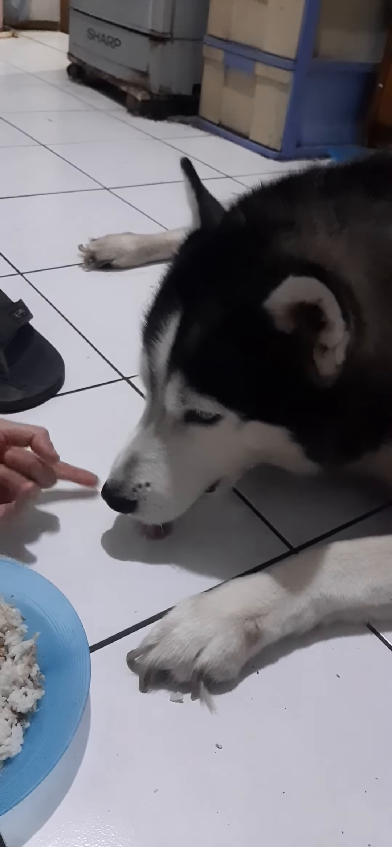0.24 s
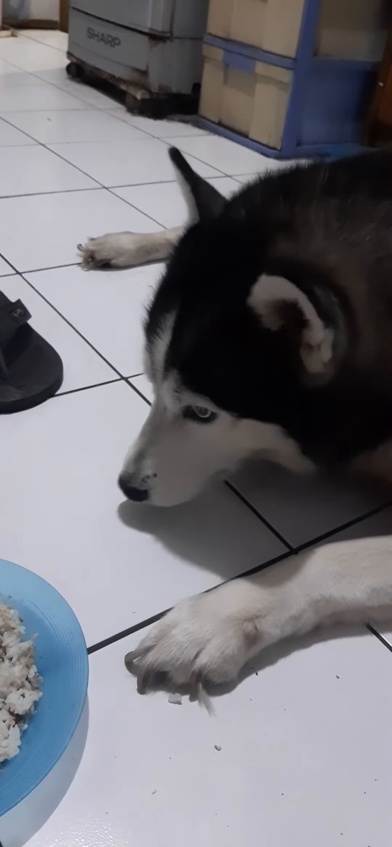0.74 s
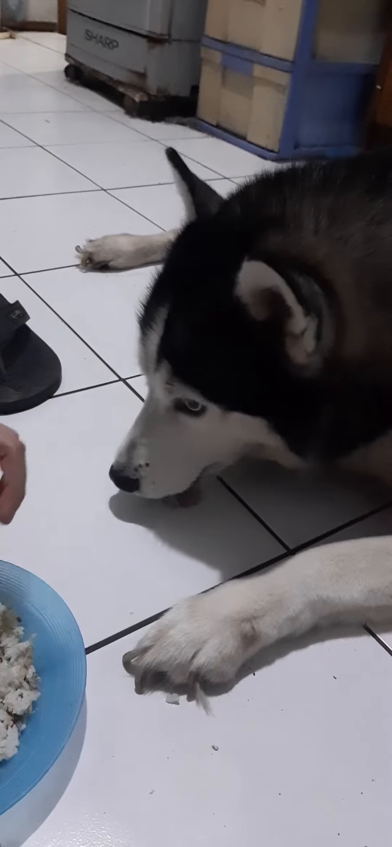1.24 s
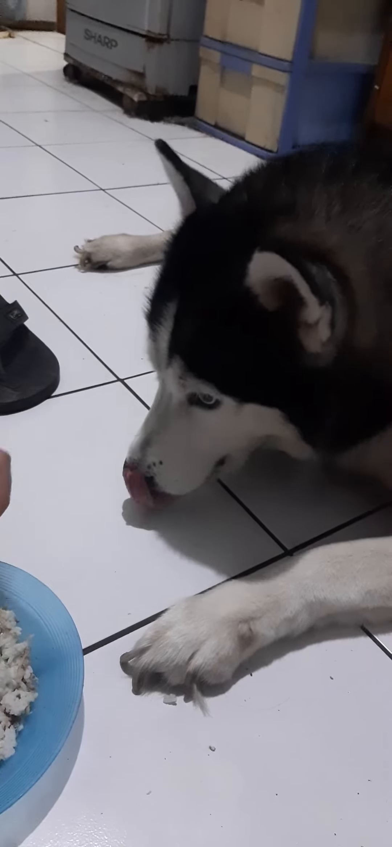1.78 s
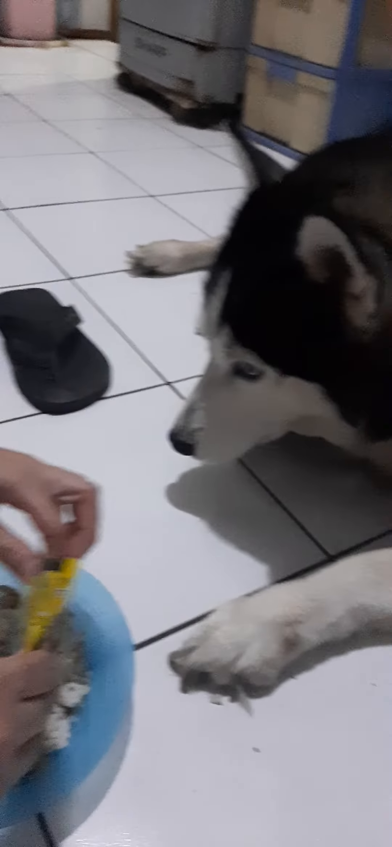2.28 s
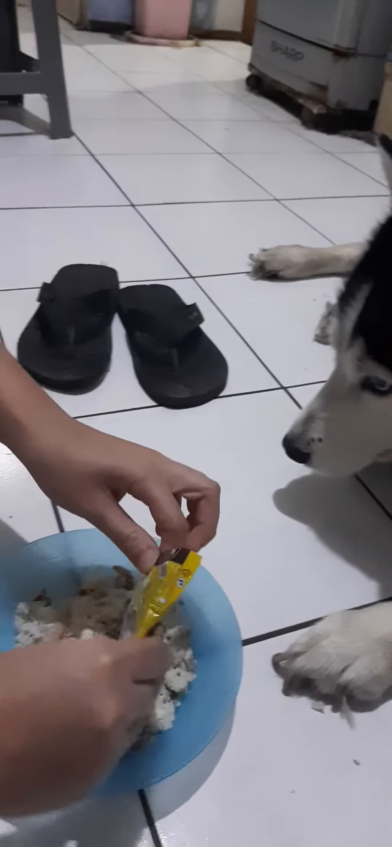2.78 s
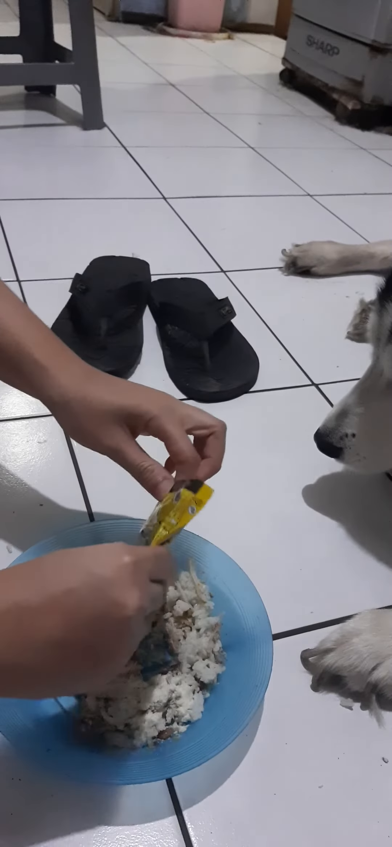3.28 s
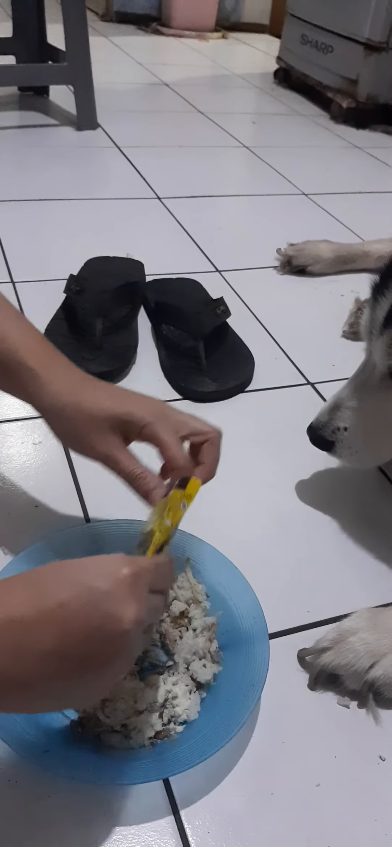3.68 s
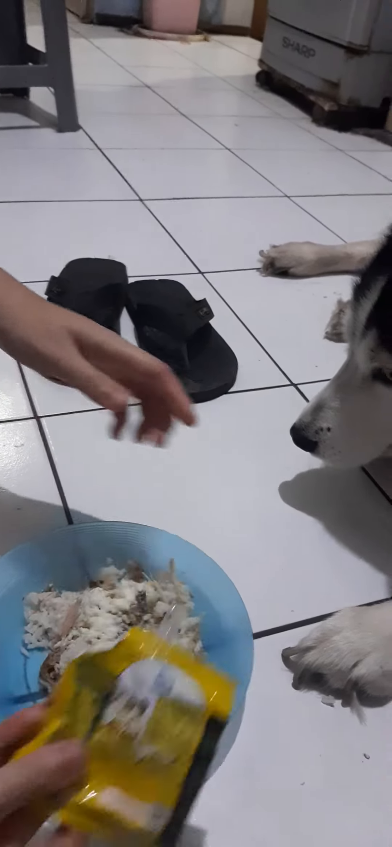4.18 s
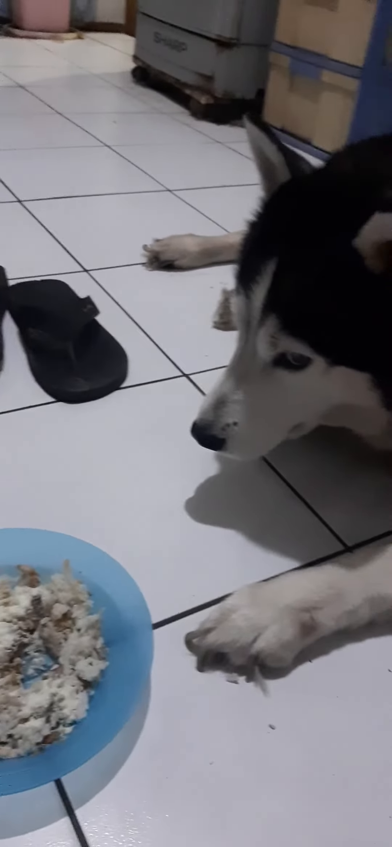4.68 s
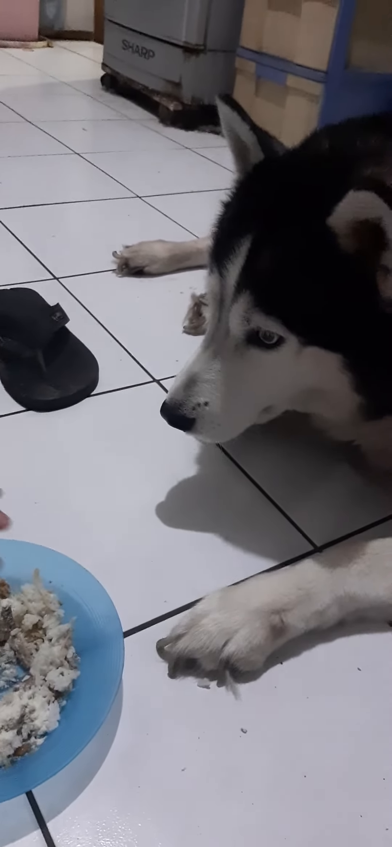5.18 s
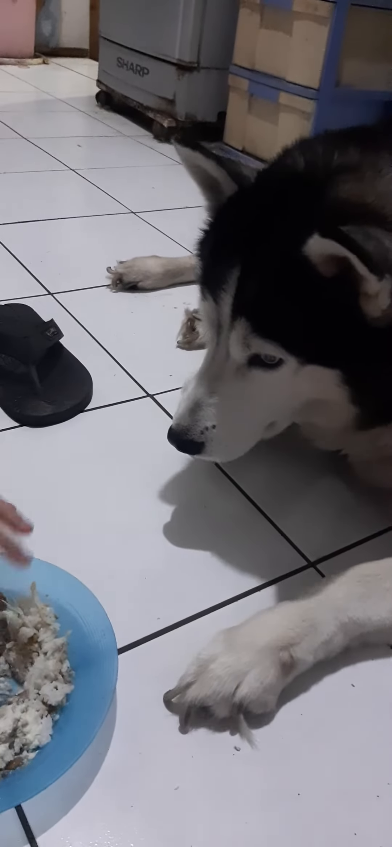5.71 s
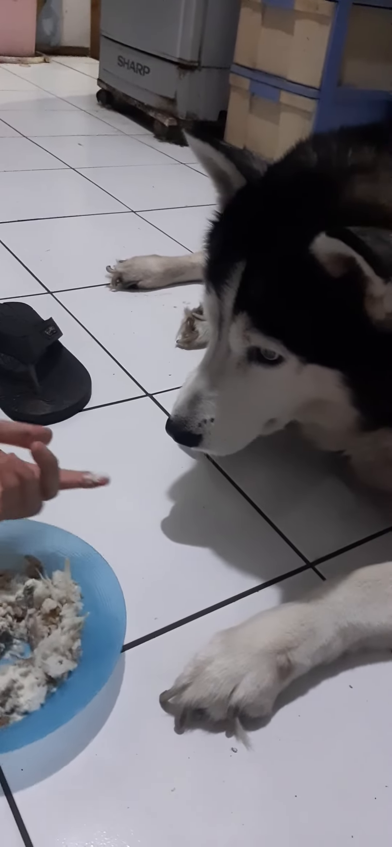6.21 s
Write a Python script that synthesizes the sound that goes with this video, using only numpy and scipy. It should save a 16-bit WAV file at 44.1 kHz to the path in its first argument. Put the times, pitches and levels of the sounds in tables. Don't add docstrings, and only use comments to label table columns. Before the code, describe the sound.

A small plastic sachet crackles sharply in the hands, torn, squeezed and crumpled close by in a tiled room over a low machine hum.

```python
import sys
import numpy as np
from scipy import signal
from scipy.fft import rfft, irfft, next_fast_len
from scipy.io import wavfile
from scipy.ndimage import uniform_filter1d, map_coordinates

SR = 44100
rng = np.random.default_rng(int(sys.argv[2]) if len(sys.argv) > 2 else 0)


def digitize_waveform(pressure):
    field = np.atleast_2d(pressure).T
    bounded = np.clip(field, -1, 1)
    quanta = np.round(bounded * 32767).astype(np.int16)
    wavfile.write(sys.argv[1], SR, quanta)


def voltage_ratio(decibels):
    exponent = np.asarray(decibels, float) / 20
    return 10 ** exponent


N = 284445
TIME = np.arange(N) / SR
FLURRY = 1024

# time in seconds
# (the flurry begins 1.8 ms earlier), # level in dB, ring in Hz, treble in dB, length in ms.
DEEP_FOLDS = [(.5663, -51.5, 2340, -11, 7), (0.5906, -55, 2750, 4.5, 7.5), (0.7168, -51.5, 2440, 0, 4.6),
              (.7487, -40, 5570, -4.5, 2.5), (0.9005, -40.5, 2550, 5.5, 3),
              (1.0922, -42, 1720, -20, 2.7), (1.0985, -36, 2250, -3, 6.1), (1.159, -44, 2120, -13, 4),
              (1.1841, -44, 1550, -18, 5.9), (1.4627, -37, 3800, -6.5, 4.7), (1.4832, -44, 1980, -4, 4),
              (1.543, -42, 2280, -16, 4.2), (1.5762, -39, 2020, -30, 6.5), (1.6433, -41, 1500, -28, 7.1),
              (1.654, -39.5, 5200, -9, 5.2), (1.708, -37.5, 2060, -7, 4.3), (1.753, -35, 1900, -3.5, 12),
              (1.8326, -39.5, 2070, -5, 9.7), (1.9347, -44.5, 2150, -2, 4.1),
              (1.9765, -51, 2130, -5, 5.9), (2.008, -42, 2160, -2.5, 3.5), (2.0798, -50, 2070, -12, 3.7),
              (2.098, -39, 3800, -3, 8.1), (2.1417, -46.5, 4390, -2, 6.3), (2.165, -49, 2080, 2, 6.8),
              (2.1997, -47, 1970, 0, 5.5), (2.2504, -48, 2130, -4, 7.7), (2.2788, -43, 2770, -13, 7.7),
              (2.3245, -45.5, 4400, 6, 3.7), (2.35, -49, 2070, -15, 5.1),
                   (2.463, -36.5, 3970, -8, 5.6), (2.5081, -42, 2500, -1, 6), (2.542, -39, 4300, -22, 5.1),
                   (2.5921, -40.5, 3950, 0, 5), (2.6141, -39.5, 2030, -6, 6), (2.621, -41, 1080, -10, 3.7),
                   (2.7835, -40.5, 1010, -22, 5.4), (2.8243, -44, 4520, 5, 4.5),
                   (2.9889, -41, 2020, -20, 4.6), (3.0318, -47.5, 2190, -16, 4.1),
                   (3.0662, -44, 5070, 2, 5.5), (3.0753, -48.5, 2240, 3, 5.5),
                   (3.1113, -45.5, 2170, -6, 6.6), (3.1328, -43, 1620, 0.5, 5.5),
                   (3.155, -42, 2360, -23, 4.8), (3.2103, -45, 2300, 10.5, 4.6),
                   (3.3424, -44, 2200, -8, 8.9), (3.366, -45, 2370, -12, 6.1), (3.4331, -42, 4160, -10, 6),
                   (3.5403, -43.5, 2270, -10, 5.3), (3.6035, -30.5, 2190, -4, 7.6),
                   (3.6219, -26, 2100, -1.5, 2.9), (3.6775, -33, 2150, -6, 6.8),
                   (3.715, -26.5, 2180, 1, 4.4), (3.7951, -41.5, 1940, -36, 5.1),
                   (3.815, -35.5, 2090, -9, 11), (3.9048, -49, 2000, -12, 5.5),
                   (4.1264, -47.5, 1090, -29, 8.8), (4.661, -37, 4300, -5, 3.5)]
# time in seconds (the flurry begins 1.8 ms earlier), level in dB, ring in Hz, treble in
# dB, length in ms.
THIN_CREASES = [(.5542, -48.5, 3840, -11, 7.6), (.5744, -48.5, 1340, -1, 8.8),
                (.8628, -50.5, 880, -4, 5.5), (1.058, -44.5, 4800, 3, 4), (1.1104, -43.5, 2900, -9, 5),
                (1.124, -50, 2300, -8, 7.9), (1.1633, -38.5, 2900, -15, 6), (1.1702, -37, 1880, -9, 5),
                (1.2138, -40, 2220, -12, 4.6), (1.2254, -48, 2360, 9, 5), (1.2295, -33.5, 2250, -3, 3.6),
                (1.241, -44, 2500, -11, 3.7), (1.325, -54, 4360, 4, 11), (1.348, -47.5, 1740, -1, 4.5),
                (1.3812, -47, 1590, -25, 5.5), (1.4188, -43.5, 1640, -8, 12),
                (1.432, -39, 2500, -12, 4.9), (1.4461, -45, 2230, 0, 6.1), (1.4516, -37, 3780, -19, 5.9),
                (1.4721, -43.5, 2090, -10, 4.9), (1.586, -43, 2000, -3, 10),
                (1.686, -40, 1720, -12, 3.9), (1.7393, -36.5, 1930, -9, 5.5), (1.772, -47, 1680, 7, 5.2),
                (1.839, -45, 2280, 3, 3.7), (1.8457, -43, 2280, -10, 5.1), (1.8928, -45, 4220, -10, 5.5),
                (1.9062, -43, 1850, -5, 3.9), (1.9257, -41, 4350, -24, 5.5), (1.998, -48, 2150, 1, 11),
                (2.2631, -41, 4800, 8, 6.4),
                (2.3714, -43, 2040, -3, 5.5), (2.392, -39.5, 2160, -9, 3.5),
                     (2.4312, -37, 1970, -20, 4.7), (2.4375, -35.5, 5250, -2, 10.6),
                     (2.447, -37.5, 2700, -15, 5), (2.5236, -44.5, 2000, -4, 6.5), (2.551, -50, 4160, 9, 5),
                     (2.599, -35.5, 5030, -0.5, 8.2), (2.6555, -45.5, 4100, -4, 5.5),
                     (2.6854, -37.5, 2580, -6, 5), (2.696, -46, 1050, -22, 4.4),
                     (2.728, -35, 1910, -12, 5.8), (2.7634, -43.5, 2120, -21, 7.2),
                     (2.7708, -43, 2080, -27, 4.9), (2.802, -39.5, 4200, -16, 4), (2.82, -37, 4240, 0, 4),
                     (2.838, -42.5, 2120, -21, 5.5), (2.8874, -41, 2260, -3, 5.5),
                     (2.957, -48, 3290, -23, 4.4), (3.0432, -44, 2230, -9, 6.4),
                     (3.052, -42, 4260, -11, 4.4), (3.0608, -44, 2220, -26, 6.5),
                     (3.192, -40.5, 1720, -17, 7), (3.2, -43, 2190, -26, 10), (3.2258, -48, 1720, -18, 6.3),
                     (3.2479, -36.5, 1960, -15, 3.6), (3.267, -50, 4100, 10.5, 4.8),
                     (3.321, -43, 2300, -11, 4.9), (3.3556, -42, 2270, -9, 5.1),
                     (3.3939, -40, 1970, -41, 5),
                (3.5018, -41, 2100, -7.5, 6.8), (3.5203, -60, 2140, -17, 5.5),
                     (3.5655, -33, 2150, -20, 3.3), (3.5897, -39, 2300, -6, 6.1),
                     (3.608, -29, 2180, -14, 5.5), (3.6157, -34, 2920, 4.5, 4.1), (3.643, -52, 2500, -8, 5),
                     (3.655, -48, 2600, -10, 4.5), (3.667, -43, 2100, -10, 4), (3.688, -40.5, 3000, 2, 10),
                     (3.702, -39, 1510, 1, 6.7), (3.7079, -33, 2200, -16, 4.9),
                     (3.7189, -36, 2100, -9, 5.9), (3.728, -39, 2200, -5, 5), (3.739, -46, 2200, 1, 4.1),
                     (3.8005, -37.5, 2030, -0.5, 7.4), (3.809, -37.5, 2070, -15, 4.7),
                     (3.8217, -39.5, 2500, -2, 5.5), (3.8333, -35.5, 2100, -8, 4.5),
                     (3.888, -48.5, 2140, -7, 6.4), (3.9509, -43, 2180, -6.5, 3.5),
                (4.171, -41, 5030, -2.5, 2.6), (4.2042, -48.5, 4200, 9.5, 3.7),
                    (4.22, -47.5, 2170, -11, 4.8), (4.515, -49, 2500, -14, 6.3),
                    (4.5197, -42, 4100, -9, 3.1), (4.5708, -48, 2070, -16, 3.9),
                    (4.6232, -44.5, 1950, 6, 5.6), (4.6405, -47, 4300, -14, 5.1),
                    (4.6516, -51, 1890, -15, 4.7), (4.6692, -35, 2100, -14, 5.8),
                    (4.6869, -31, 3460, -9, 5.8), (4.694, -34, 3350, -16, 2.7), (4.7, -40, 2600, -13, 5.4),
                    (4.707, -46, 2470, -14, 5), (4.717, -41, 2660, -17, 6.4),
                    (4.731, -48.5, 2700, -16, 8.9), (4.743, -48, 2570, -13, 5.5)]
FAINT_CREASES = [(.914, -55, 2200, 7, 4), (.932, -53, 2300, -7, 3.5), (.948, -55, 2100, -4, 4),
                 (1.128, -57, 2400, -6, 4), (1.411, -58, 1500, -17, 5.9), (1.625, -52, 2200, -12, 5),
                 (1.671, -54, 2300, 4, 7), (1.7583, -41, 1500, -6, 3.1), (1.78, -50, 2200, -10, 3.6),
                 (1.827, -46, 2200, -6, 4.6), (1.915, -49, 3500, -3, 3.5), (2.034, -55, 4200, -8, 3.7),
                 (2.181, -48, 1400, -16, 6.2), (2.295, -48, 2000, -3, 5), (2.36, -48, 2100, -10, 5),
                 (2.915, -50, 1800, -16, 4.5), (2.971, -51, 1500, -23, 7.2), (3.169, -49, 2500, -6, 4),
                 (3.2154, -43, 2300, 5, 4), (3.283, -54, 2200, 7, 5.2), (3.337, -47, 2300, 0, 5),
                 (3.422, -50, 2300, -4, 3.5), (3.482, -51.5, 1710, -12, 4.3), (4.564, -53, 1900, -15, 4.5),
                 (4.583, -53, 2200, -14, 4), (4.677, -47, 1900, -12, 5.7)]
# time in seconds (the ring begins 1.4 ms earlier), level in
# dB, ring in Hz.
SHORT_RINGS = [(1.0573, -43, 5300), (1.0998, -41.5, 1500), (1.2294, -44, 3080), (1.4331, -50, 1660),
               (1.4634, -48, 1560), (1.4635, -48, 7810), (1.4827, -35, 5150), (1.5768, -51, 750),
               (1.5784, -44, 665), (1.644, -49, 3650), (1.6871, -42, 1580), (1.7417, -45, 9450),
               (1.753, -34, 2110), (1.7566, -37, 12100), (1.7727, -45, 7900), (2.2635, -45, 2030),
               (2.4364, -37, 2110), (2.437, -42, 4600), (2.4447, -41, 3970), (2.4472, -42, 5250),
               (2.4581, -44, 2080), (2.4635, -52, 670), (2.5078, -46, 4680), (2.5079, -45, 4850),
               (2.5919, -44, 5490), (2.5985, -43, 11690), (2.6187, -47, 4340), (2.6861, -47, 3870),
               (2.7287, -43, 8840), (2.8253, -50, 1520), (3.2151, -50, 6500), (3.2159, -49, 4100),
               (3.2667, -44, 8830), (3.2673, -44, 2250), (3.2674, -54, 3050), (3.565, -46, 1490),
               (3.5912, -45, 3250), (3.623, -37, 1550), (3.7064, -47, 7340), (3.7069, -38, 4250),
               (3.7141, -47, 3600), (3.7144, -25, 5120), (3.7146, -39, 1000), (3.7151, -44, 1570),
               (3.7284, -46, 11380), (3.7939, -49, 1530), (3.8086, -45, 4150), (3.8192, -42, 1490),
               (3.9517, -42.5, 870), (4.2036, -56, 4800), (4.2038, -45, 7340), (4.6234, -42, 9720),
               (4.6253, -47, 1870), (4.641, -40, 1830), (4.6604, -40, 2000), (4.6684, -36, 4310),
               (4.6696, -50, 5820), (4.6696, -53, 1000), (4.6864, -34, 1690), (4.6869, -34.5, 2490)]
# time in seconds, level in dB.
HANDLING = [(0, -69.5), (.45, -66), (.6, -61.5), (1.0, -59.5), (1.5, -55), (1.8, -57), (2.3, -51.5),
            (2.75, -51), (2.95, -57), (3.2, -50), (3.47, -56.5), (3.65, -52), (3.9, -56), (3.99, -57.5),
            (4.05, -65.5), (4.12, -56), (4.25, -58), (4.42, -66), (4.7, -47.5), (4.9, -55)]
# frequency in Hz, density in dB
# per Hz.
FILM_COLOUR = [(350, -29), (600, -1.5), (1340, 0.5), (2210, 2), (2680, -2.5), (14200, -16.5), (15800, -16),
               (16500, -76)]
# time in seconds, level in dB.
RUB = [(4.8, -55.5), (5.3, -64), (5.5, -68), (5.72, -68), (5.82, -63), (5.93, -58), (6.0, -58),
       (6.07, -54.5), (6.12, -55), (6.17, -57.5), (6.22, -53.5), (6.26, -56.5), (6.32, -55), (6.45, -60.5)]
# frequency in Hz, density in dB per Hz.
CLOTH_COLOUR = [(290, -19), (500, -12), (570, -11), (1660, -10.5), (3930, -15.5), (12900, -20),
                (15800, -22), (16500, -51)]
# band centre in Hz, T60 in seconds, level in dB.
ROOM_TAIL = [(646, 0.26, -27.5), (2500, 0.39, -24.5), (5570, 0.23, -16.5), (11400, 0.33, -16.5)]
# frequency in Hz, level in dB.
HUM_COLOUR = [(18, -48), (30, -10), (137, -6), (244, -9.5), (301, -3), (496, -12.5), (566, -11), (628, -11),
              (955, -24.5), (1340, -23), (1840, -31), (2270, -45), (3360, -37.5), (3940, -31), (15800, -47)]
# frequency in Hz, width in Hz, level in dB.
ROOM_TONES = [(136.6, 19.7, -62.5), (203.3, 6.7, -71), (270.5, 7, -66), (310.3, 19.7, -60.5),
              (364.9, 13.9, -63.5), (496.5, 15, -69.5), (1293, 90, -71), (2400, 470, -70.5)]
# time in seconds, peak in dB, half length in seconds.
DRONE_SWELLS = [
    (0.693, -44, 0.057),
    (0.994, -63, 0.18),
    (1.794, -49.5, 0.15),
    (2.3, -47, 0.078),
    (2.996, -47, 0.057),
    (3.815, -44, 0.04),
    (4.808, -61.5, 0.54),
    (5.8, -63, 0.14),
    (6.45, -50, 0.51),
]
# frequency in Hz, shared part from 0 to 1.
LIKENESS = [(60, 0.8), (200, 0.99), (320, 0.98), (650, 0.79), (900, 0.26), (15000, 0)]
# frequency in Hz, left minus right in dB.
PORT_TILT = [(60, 6), (110, 6.5), (200, -2.5), (380, 0), (700, 2), (1290, -1), (2380, -0.5), (4400, 0),
             (8120, 2), (15000, 1.5)]
# frequency in Hz, angle in radians.
PORT_TURN = [(60, -0.17), (200, -0.45), (400, -0.58), (800, 0.2)]


def along(table, hz):
    table_hz, value = np.transpose(table)
    return np.interp(np.log(np.maximum(hz, 1)), np.log(table_hz), value)


def curve(table):
    return np.interp(TIME, *np.transpose(table))


def level(x, db):
    return x * voltage_ratio(db) / np.sqrt(np.mean(x ** 2))


def shaped(x, table):
    n = next_fast_len(N)
    gain = voltage_ratio(along(table, np.fft.rfftfreq(n, 1 / SR)))
    return irfft(rfft(x, n) * gain, n)[..., :N]


def band(x, lo_hz, hi_hz):
    return signal.sosfilt(signal.butter(2, [lo_hz, min(hi_hz, .45 * SR)], "band", fs=SR, output="sos"), x)


def walk(rate):
    k = int(SR / rate)
    steps = np.repeat(rng.standard_normal(N // k + 1), k)
    return 1.58 * uniform_filter1d(uniform_filter1d(steps, k), k)[:N]


def pair():
    alike = np.clip(along(LIKENESS, np.fft.rfftfreq(N, 1 / SR)), 0, .99)
    mid, side = rfft(rng.standard_normal((2, N)))
    mid, side = mid * np.sqrt(1 + alike), side * np.sqrt(1 - alike)
    return irfft(np.array([mid + side, mid - side]), N) / 2


def crease(hz, treble_db, length_ms, body_db, both, each, lag):
    t = np.arange(FLURRY) / SR
    first_break = 1 + 0.13 * np.exp(-((t - 0.0018) / 0.00054) ** 2)
    start = (1 - np.exp(-t / 0.00043)) * first_break
    hold = np.exp(-(1000 * t / np.clip(length_ms, 2, 15)) ** 2.26)
    shape = start * (hold + voltage_ratio(-13) * np.exp(-t / 0.0035))
    both = both + 5.5 * both.std() * (np.arange(FLURRY) == int(.0007 * SR))
    lag_samples = int(np.clip(4 + 3.5 * lag, -8, 14))
    direct = np.array([np.roll(both, lag_samples), both])
    snaps = shape * (2.8 * direct + each)
    opening_s = 0.00083 + .00006 * max(-treble_db, 0)
    snaps = snaps * (6.5 - np.exp(-t / opening_s))

    pole = np.exp(-np.log(1000) * hz / (14.2 * SR))
    ring = signal.lfilter([1, 0, -1], [1, -2 * pole * np.cos(2 * np.pi * hz / SR), pole ** 2], snaps)
    ring = ring * (1 - np.exp(-t / 0.00052))
    body = band(shape * (both + 0.2 * each), 502, 1220)
    crisp = snaps * np.exp(-t / 0.055)
    head = t < .005

    def at(part, db):
        power = part[:, head].var() / 2 + part[:, head].mean(axis=0).var()
        return voltage_ratio(db) * part / np.sqrt(power)

    ring = at(ring, -1.5 - 2.0 * max(hz / 1000 - 2.6, 0))
    rest = at(band(snaps, 1020, 3030), -6) + at(body, body_db - .4)
    rest = rest + at(band(crisp, 1760, 6500), 0.31 * treble_db - 5.5)
    rest = rest + at(band(crisp, 2030, 14460), treble_db + 0.5)
    return rest + np.array([ring, 0.62 * ring])


def creases(rows, body_db):
    out = np.zeros((2, 2, N + FLURRY))
    for s, db, hz, treble_db, length_ms in rows:
        hardness_db = 3.0 * np.minimum(rng.exponential(size=(3, FLURRY)), 3.5)
        both, *each = rng.standard_normal((3, FLURRY)) * voltage_ratio(hardness_db)
        lag, pan = rng.standard_normal(2)
        sound = crease(hz, treble_db, length_ms, body_db, both, np.array(each), lag)
        pan_db = 0.86 * pan * np.array([[1], [-1]])
        i = int((s - .0018) * SR)
        out[..., i:i + FLURRY] += voltage_ratio(db - 4.0 + pan_db) * sound
    return out[..., :N]


def short_rings():
    out, t = np.zeros((2, N + FLURRY)), np.arange(FLURRY) / SR
    for s, db, hz in SHORT_RINGS:
        detune, phase, lag = rng.standard_normal((3, 3))
        fall_s = min(0.0026, 10.0 / hz)
        shape = (1 - np.exp(-(t / 0.00042) ** 2)) * np.exp(-t / fall_s)
        late = np.array([t - .0001 * (1 + lag[0]), t])
        modes = 0
        for k, size in enumerate((1, .5, .4)):
            mode_hz = hz * (1 + .08 * detune[k] * k)
            modes = modes + size * np.sin(2 * np.pi * (mode_hz * late + phase[k]))
        i = int((s - .0014) * SR)
        out[:, i:i + FLURRY] += voltage_ratio(db + 6) * shape * modes
    return out[:, :N]


def crackle():
    rate, smear_s = 700, 0.0029
    ticks = (rng.random(N) < rate / SR) * voltage_ratio(2.5 * rng.exponential(size=N))
    puffs = signal.lfilter([1], [1, -np.exp(-1 / (smear_s * SR))], ticks)
    uneven = voltage_ratio(1.5 * walk(30))
    hiss = 0.32
    film = shaped(rng.standard_normal((2, N)) * uneven * (puffs / puffs.mean() + hiss), FILM_COLOUR)
    put_down = np.clip((4.85 - TIME) / 0.21, 0, 1)
    return voltage_ratio(curve(HANDLING)) * level(film, -0.81) * put_down


def rubbing():
    rub_db = curve(RUB)
    uneven = voltage_ratio(0.11 * walk(25) + 1.0 * walk(120))
    rub = level(shaped(rng.standard_normal((2, N)) * uneven, CLOTH_COLOUR), 5.9)
    rub = rub + band(rub, 3150, 19600) * (voltage_ratio(0.63 * (rub_db + 51.5)) - 1)
    patch = level(band(rub, 1550, 2250), -6.5) * voltage_ratio(2.5 * walk(25) + 0.51 * (rub_db + 54))
    thud_db = -64 + 1.4 * (rub_db + 59.5) + 15 * (TIME - 6.1)
    thud = level(band(pair(), 43, 160), 5.3)
    start = np.clip((TIME - 4.7) / 0.56, 0, 1)
    return start * (voltage_ratio(rub_db) * (rub + patch) + voltage_ratio(thud_db) * thud)


def room(x):
    t = np.arange(SR // 2) / SR
    tail = 0
    for hz, t60, db in ROOM_TAIL:
        noise = level(band(pair()[:, :len(t)], hz / 3.4, hz * 1.5), db)
        tail = tail + noise * np.exp(-np.log(1000) * t / t60)
    tail = tail * (t > .003) * voltage_ratio(-22.5)
    wet = signal.fftconvolve(x, tail, axes=1)[:, :N]
    return np.array([map_coordinates(w, [np.arange(N) + 1.4 * walk(350)], order=3) for w in wet])


def hum():
    air = level(shaped(pair(), HUM_COLOUR), -53.5)
    swell = voltage_ratio(-57)
    for s, db, half_s in DRONE_SWELLS:
        swell = swell + voltage_ratio(db) * np.exp(-((TIME - s) / half_s) ** 2)
    drone = level(band(pair(), 96.5, 106.5), -8.5) * swell
    tones = 0
    for hz, width_hz, db in ROOM_TONES:
        tone = level(band(pair(), hz - width_hz / 2, hz + width_hz / 2), db)
        tones = tones + tone * voltage_ratio(1.05 * walk(2.69) + 1.6 * walk(11))
    return air + drone + tones


def scene():
    thin_rows = THIN_CREASES
    fold_snaps, fold_send = creases(DEEP_FOLDS, body_db=-3.5)
    thin_snaps, thin_send = creases(thin_rows, body_db=-12.5)
    faint_snaps, _ = creases(FAINT_CREASES, body_db=-12.5)
    sachet = fold_snaps + thin_snaps + faint_snaps + short_rings() + crackle()
    return sachet + rubbing() + room(fold_send + thin_send) + hum()


def band_limit(x):
    return signal.sosfilt(signal.butter(12, 16810, fs=SR, output="sos"), x)


def record(dry):
    hz = np.fft.rfftfreq(N, 1 / SR)
    half = voltage_ratio(along(PORT_TILT, hz) / 2) * np.exp(.5j * along(PORT_TURN, hz))
    ports = irfft(rfft(dry) * np.array([half, 1 / half]), N)
    ports = signal.sosfilt(signal.butter(4, 42, "high", fs=SR, output="sos"), ports)
    ports = signal.sosfilt(signal.ellip(8, .3, 60, 15850, fs=SR, output="sos"), ports)
    return band_limit(ports)


dry = scene()
out = record(dry)
digitize_waveform(out)
```